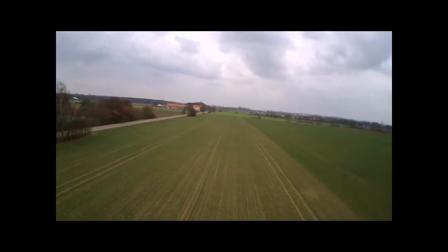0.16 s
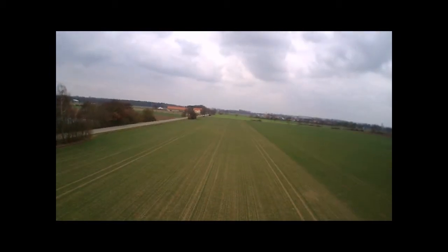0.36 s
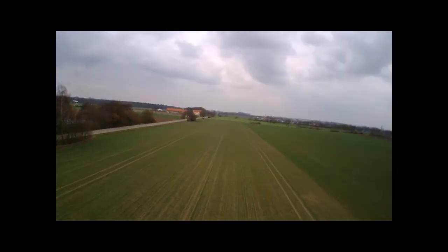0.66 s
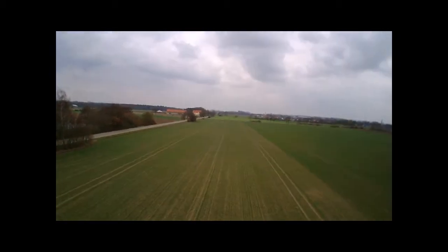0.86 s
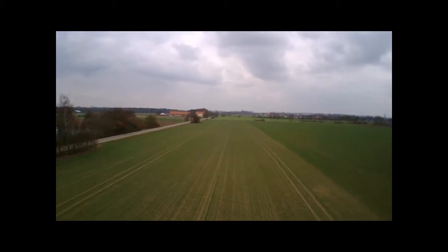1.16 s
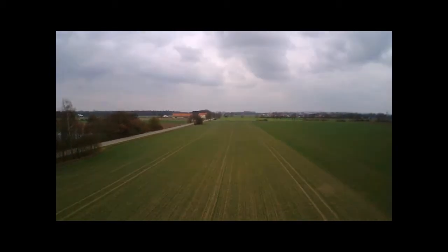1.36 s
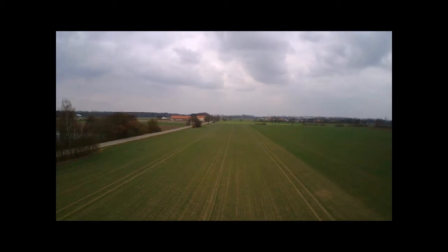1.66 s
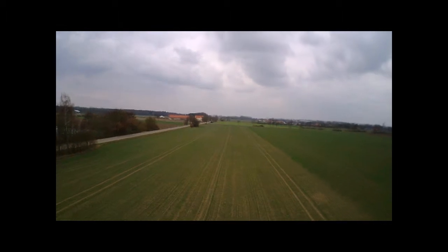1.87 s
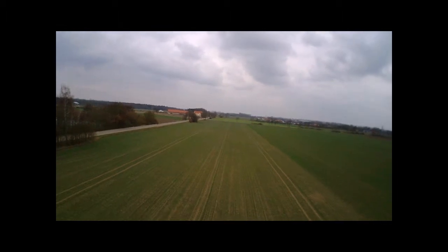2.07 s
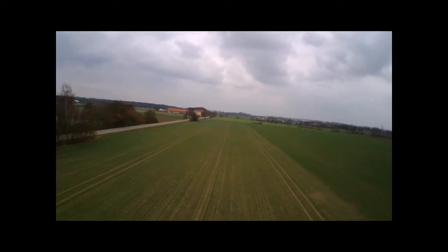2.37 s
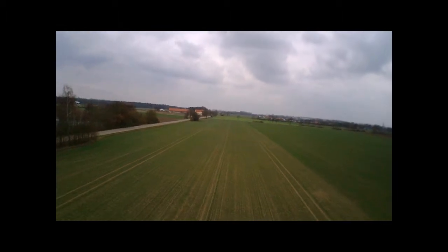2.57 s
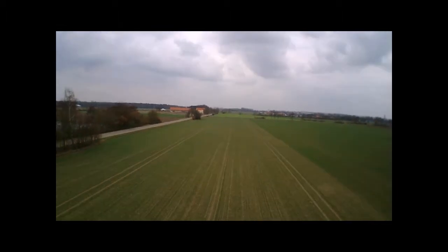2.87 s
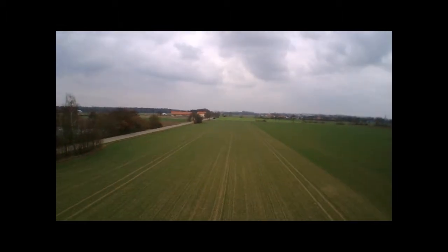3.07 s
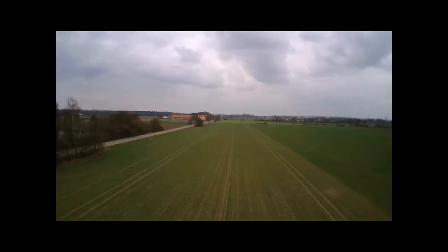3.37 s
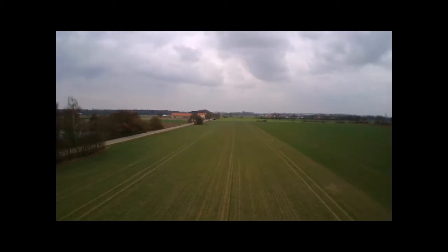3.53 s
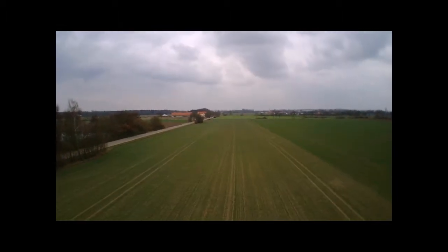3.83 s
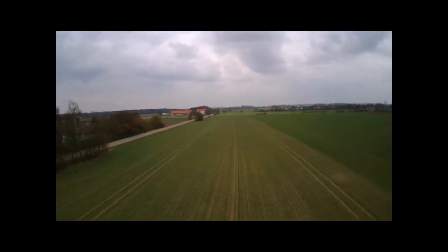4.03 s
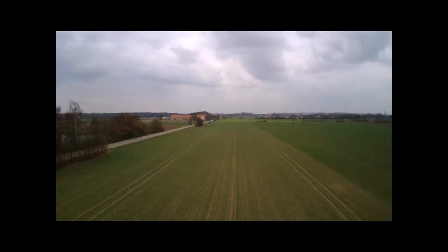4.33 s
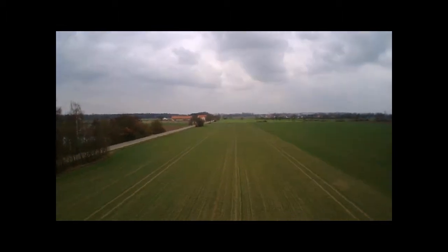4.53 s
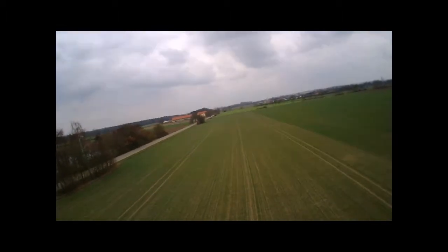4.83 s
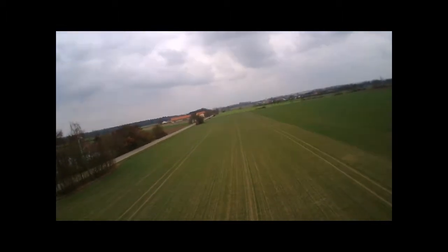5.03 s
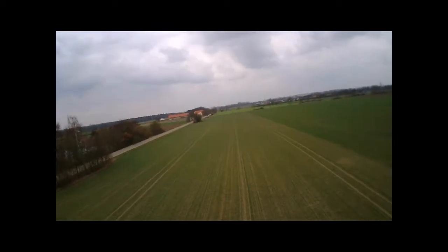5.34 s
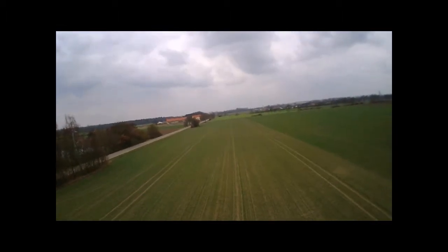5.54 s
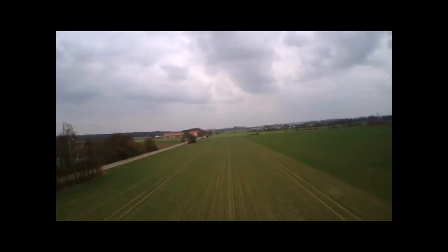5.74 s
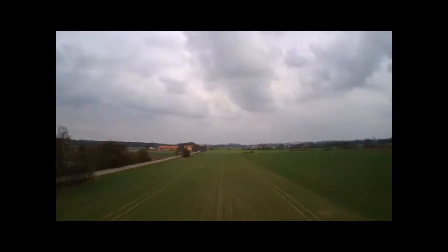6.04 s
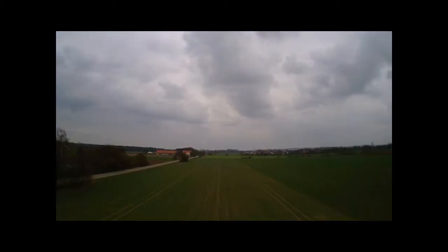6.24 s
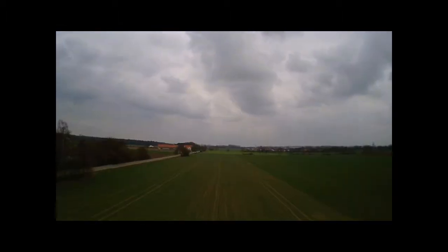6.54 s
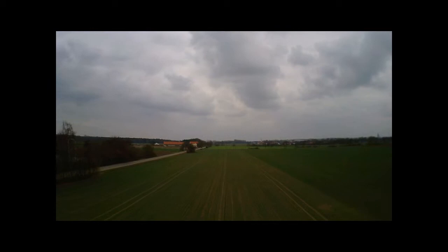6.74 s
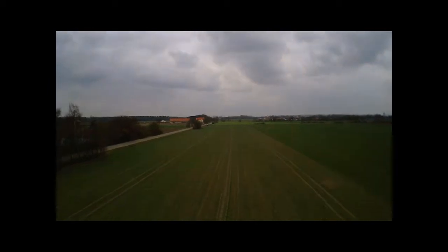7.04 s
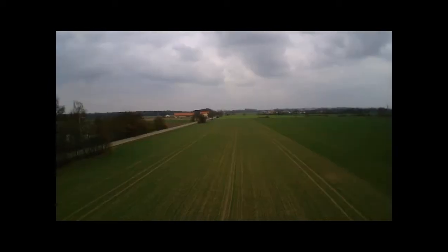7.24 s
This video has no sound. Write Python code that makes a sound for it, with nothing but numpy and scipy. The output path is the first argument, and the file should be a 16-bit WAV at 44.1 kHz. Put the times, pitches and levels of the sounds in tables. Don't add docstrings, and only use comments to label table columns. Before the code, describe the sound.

A small camera drone flies outdoors over open fields. Four electric rotors give a loud, low, buzzing hum whose slightly different speeds beat and waver throughout. Propeller hiss rides on top, with a very faint high motor whine. Early wind gusts rumble softly, and sudden short knocks hit the microphone. The onboard microphone is very close, dull, narrow in range and clipping, without echo.

```python
import sys
import numpy as np
from scipy import signal
from scipy.fft import rfft, irfft
from scipy.io import wavfile
from scipy.ndimage import uniform_filter1d

SR = 44100
rng = np.random.default_rng(int(sys.argv[2]) if len(sys.argv) > 2 else 0)


def invert_db(x):
    u = np.asarray(x, float) / 20
    return 10 ** u


def store_pcm(level_fs):
    pcm = np.round(np.clip(level_fs, -1, 1) * 32767).astype(np.int16)
    wavfile.write(sys.argv[1], SR, np.atleast_2d(pcm).T)


N = 326340


def in_time(rows):
    time_s, *columns = np.transpose(rows)
    return np.array([np.interp(np.arange(N) / SR, time_s, column) for column in columns])


def rms_one(x):
    return x / np.sqrt(np.mean(x ** 2) + 1e-20)


def drift(rate_hz):
    pole = np.exp(-80 * np.pi * rate_hz / SR)
    noise = rng.standard_normal(N // 40 + 2002)
    slow = signal.lfilter([1], [1, -2 * pole, pole * pole], noise)[2000:]
    return np.interp(np.arange(N) / 40, np.arange(len(slow)), rms_one(slow))


def bumps(times_s, heights, width_s):
    coarse_s = np.arange(0, N + 40, 40) / SR
    bells = np.exp(-.5 * ((coarse_s - np.array(times_s)[:, None]) / width_s) ** 2)
    return np.interp(np.arange(N) / SR, coarse_s, np.array(heights) @ bells)


def speeds():
    # (time [s], blade-pass rate [Hz])
    course_a = [(0.0, 126.56), (0.26, 134.34), (0.51, 129.69), (0.88, 133.73), (1.1, 128.53),
                (1.92, 129.81), (2.22, 136.53), (2.38, 130.88), (2.83, 129.71), (3.24, 125.81),
                (4.11, 129.11), (4.88, 121.26), (5.04, 131.6), (5.27, 126.39), (5.62, 135.89),
                (6.38, 143.58), (6.55, 144.46), (7.4, 126.56)]
    course_b = [(0.0, 138.2), (0.5, 138.1), (0.86, 135.19), (1.12, 139.99), (1.41, 132.02), (1.64, 136.26),
                (2.23, 141.08), (2.45, 138.01), (3.04, 137.95), (3.58, 132.67), (3.67, 135.69),
                (4.63, 137.26), (4.73, 131.14), (5.24, 136.99), (5.42, 129.45), (6.2, 144.02),
                (6.78, 145.65), (7.4, 126.92)]
    course_c = [(0.0, 139.79), (0.48, 148.69), (0.72, 140.97), (0.99, 149.33), (1.37, 146.05),
                (1.62, 156.47), (2.0, 146.93), (3.41, 145.53), (3.56, 148.27), (4.53, 146.45),
                (4.86, 135.63), (4.98, 151.79), (5.44, 143.52), (5.72, 137.63), (6.25, 152.61),
                (6.62, 137.39), (7.17, 160.16), (7.4, 146.92)]
    course_d = [(0.0, 147.14), (0.2, 143.64), (0.54, 148.93), (0.91, 141.44), (1.1, 149.71), (1.59, 146.53),
                (1.67, 152.34), (2.52, 150.65), (2.82, 152.1), (3.52, 149.62), (4.45, 153.7),
                (4.58, 148.14), (4.76, 166.02), (4.98, 152.27), (6.05, 141.45), (6.42, 150.37),
                (7.01, 151.86), (7.4, 155.52)]
    # (time [s], rotor [0-3], change [Hz])
    trims = [(0.34, 1, -2.83), (1.56, 0, -2.1), (2.18, 2, 6.47), (2.44, 2, -1.75), (2.54, 3, -2.14),
             (2.68, 2, 1.88), (3.12, 1, -3.03), (3.44, 0, -1.95), (3.75, 3, 1.79), (4.6, 0, 4.19),
             (4.63, 2, 6.16), (4.72, 3, -6.52), (5.4, 2, 7.29), (5.4, 3, 2.23), (5.95, 3, 4.65),
             (6.31, 0, -4.0), (6.78, 2, -2.97), (6.93, 3, -3.26), (7.0, 1, -2.28), (7.14, 0, 4.06)]
    time_s, rotor, change_hz = np.transpose(trims)
    passes_hz = []
    for k, course in enumerate([course_a, course_b, course_c, course_d]):
        correction_hz = bumps(time_s, change_hz * (rotor == k), width_s=.07)
        passes_hz.append(in_time(course)[0] + correction_hz)
    return np.array(passes_hz)


def shafts(passes_hz):
    start_turns = [.0553, .3342, .2537, .2209]
    return np.pi * np.cumsum(passes_hz, axis=1) / SR + 2 * np.pi * np.array(start_turns)[:, None]


def hum(angle, ranked, shudder_db):
    # (multiple of shaft speed, A [dB], B [dB], C [dB], D [dB])
    orders_db = [(1, -60.5, -45.5, -53.5, -43.5), (2, -23, -22.5, -22.5, -21), (3, -51, -29.5, -46, -39),
                 (4, -26.5, -28, -32.5, -30.5), (5, -38, -27.5, -36, -46), (6, -37.5, -43, -30.5, -35),
                 (7, -32.5, -34.5, -46, -49), (8, -32, -37, -28.5, -37.5), (10, -45.5, -52.5, -38, -46.5),
                 (12, -62.5, -59.5, -50.5, -62.5), (14, -64, -65, -44.5, -60)]
    out = np.zeros(N)
    for row in orders_db:
        multiple = round(row[0])
        above = multiple - 2
        lead_rad = 0.886 * above
        sources = angle if multiple in (2, 4) else ranked
        for shaft, level_db in zip(sources, row[1:]):
            wander_rad = 0.04 * above * drift(2.4)
            flutter_db = .5 * abs(above) ** .5 * drift(2.9)
            gain = invert_db(level_db + flutter_db + (above > 0) * shudder_db)
            out += gain * np.cos(multiple * shaft + lead_rad + wander_rad)
    return out


def frame(angle):
    pair_shafts = [(0, 1, 0, 2), (1, 0, 2, 0), (0, 2, 1, 0), (0, 2, 0, 1)]
    pair_db = [-29, -32.5, -42.5, -38]
    # (unbalance once a turn [dB], blades twice a turn [dB])
    shake_db = [(-5.5, -5), (-8, -7), (-4, 0), (-16.5, 1)]
    mixing_db = [-24, -26.5, -28, -42]
    lead_rad = -.5
    out = invert_db(np.array(pair_db)) @ np.cos(np.array(pair_shafts) @ angle + lead_rad)

    blur_rad = [0.41 * drift(4.75) for shaft in angle]
    phasor = np.exp(1j * (angle + blur_rad))
    unbalance, blades = invert_db(shake_db).T
    shaking = unbalance @ phasor + blades @ phasor ** 2
    product = shaking
    for level_db in mixing_db:
        product = product * shaking / (.5 + np.abs(shaking))
        out = out + invert_db(level_db) * rms_one(product.real)
    return out


def hiss(angle, level_db):
    # (frequency [Hz], density [dB per Hz])
    colour_db = [(60, -39), (180, -43), (390, -10.5), (560, 5), (680, -3.5), (830, -14.5), (970, -12),
                 (1500, -5), (1850, 0), (2150, 5), (2450, -3), (2800, -11.5), (3400, -22), (3900, -16.5)]
    chop_depth = [.05, .06, .12, .2]
    table_hz, table_db = np.transpose(colour_db)
    bin_hz = np.maximum(np.fft.rfftfreq(N, 1 / SR), 1)
    colour = invert_db(np.interp(np.log(bin_hz), np.log(table_hz), table_db))
    sweep = np.exp(np.array(chop_depth) @ np.cos(2 * angle + 1.0))
    noise = rng.standard_normal(N) * sweep * invert_db(0.95 * drift(48))
    return invert_db(level_db + 4.0) * rms_one(irfft(rfft(noise) * colour, N))


def whine():
    pitch_hz = 3920 + 14 * drift(3.0)
    level_db = -52 + 4.9 * drift(2.5)
    return invert_db(level_db) * np.cos(2 * np.pi * np.cumsum(pitch_hz) / SR)


def knocks():
    # (time [s], peak level [dB])
    slap_db = [(0.8510, 2.5), (0.867, -2), (2.3356, -7.5), (4.7019, 2), (4.775, -12.5), (5.8895, -8),
               (5.909, -11), (5.9233, -8.5), (6.095, -5.5), (7.1038, -1), (7.1180, 3)]
    cavity_hz, upper_hz, upper_db = 2350, 3270, -11.5
    t60_s = 0.0068
    time_s, peak_db = np.transpose(slap_db)
    slaps = np.zeros(N)
    slaps[[round((s + .0015) * SR) for s in time_s]] = invert_db(peak_db + 2.0)
    decay = invert_db(-60 / (t60_s * SR))
    out = np.zeros(N)
    for ring_hz, gain in [(cavity_hz, 1), (upper_hz, invert_db(upper_db))]:
        w = 2 * np.pi * ring_hz / SR
        resonator = [1, -2 * decay * np.cos(w), decay * decay]
        out += signal.lfilter([0, gain * np.sin(w)], resonator, slaps + 1e-18)
    return out


def wind():
    # (time [s], peak level [dB])
    gust_db = [(.04, -27.5), (.39, -33.5), (.64, -32.5), (.83, -31), (1.15, -43), (1.82, -43), (2.9, -38.5),
               (3.08, -45), (3.44, -41.5), (3.66, -41.5), (4.3, -50), (4.92, -42), (5.9, -48),
               (7.12, -39.5)]
    calm_db, gust_s = -55.5, 0.053
    band = signal.butter(2, [18, 110], "band", fs=SR, output="sos")
    low = signal.sosfilt(band, rng.standard_normal(N))
    time_s, peak_db = np.transpose(gust_db)
    swell = invert_db(calm_db) + bumps(time_s, invert_db(peak_db), gust_s)
    return swell * rms_one(low * invert_db(2.5 * drift(19)))


def scene():
    # (time [s], level [dB])
    airflow_db = [
        (0, -23),
        (.6, -21.5),
        (1.2, -22),
        (2.2, -22.5),
        (3.8, -23.5),
        (5.3, -23),
        (5.7, -23.5),
        (6.6, -22.5),
        (7.4, -23),
    ]
    # (time [s], level change [dB])
    brief_change_db = [(.37, 2), (.87, 2), (1.08, 2), (1.97, -1), (2.16, 0.5), (2.47, -1), (2.6, 3.5), (3.02, 1.5),
                       (3.6, -1.5), (4.7, 0), (4.88, -3), (5.56, 0), (5.68, -1.5), (5.79, 2), (6.28, -4.5),
                       (6.36, -3), (6.52, -4), (7.11, 1.5)]
    passes_hz = speeds()
    angle = shafts(passes_hz)
    ranked_hz = np.sort(passes_hz, axis=0)
    ranked = shafts(uniform_filter1d(ranked_hz, size=SR // 8))

    hiss_db = in_time(airflow_db)[0]
    swing_db = 0.98 * (hiss_db - hiss_db.mean())
    time_s, change_db = np.transpose(brief_change_db)
    shudder_db = -0.42 + swing_db + bumps(time_s, change_db, width_s=0.023)

    tones = invert_db(2.0) * hum(angle, ranked, shudder_db) + invert_db(shudder_db) * frame(ranked)
    return (tones + hiss(angle, hiss_db) + whine() + knocks() + wind())[None]


def roll_off(x):
    return signal.sosfilt(signal.butter(12, 15870, fs=SR, output="sos"), x)


def record(dry):
    low_rate_hz = 8000
    up, down = low_rate_hz // 100, SR // 100
    narrow = signal.resample_poly(dry, up, down, axis=1)
    narrow = np.clip(narrow, -.5, .5)
    sharp = signal.firwin(40001, 3960, fs=low_rate_hz * SR / 100, window=("kaiser", 8))
    wide = signal.resample_poly(narrow, down, up, axis=1, window=sharp)[:, :N]
    mix = np.clip(wide, -.498, .498)
    return roll_off(mix)


dry = scene()
out = record(dry)
store_pcm(out)
```